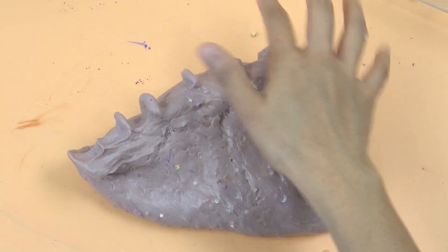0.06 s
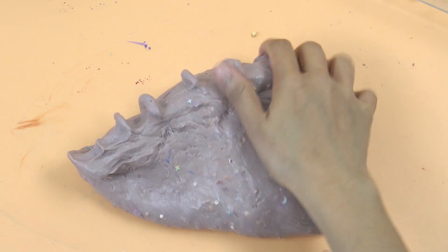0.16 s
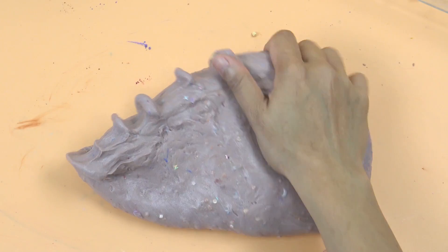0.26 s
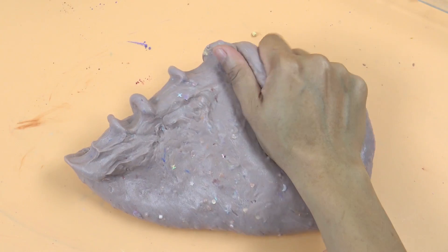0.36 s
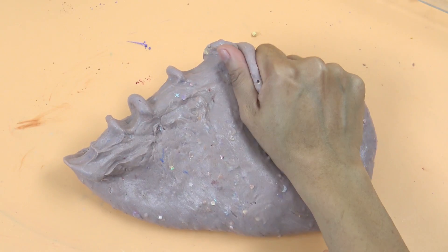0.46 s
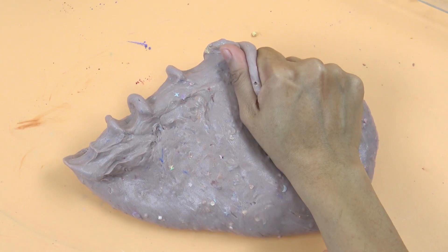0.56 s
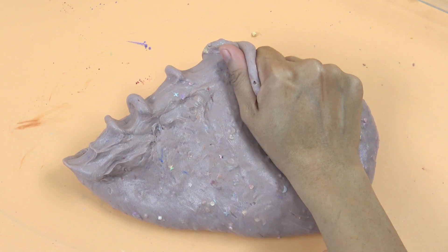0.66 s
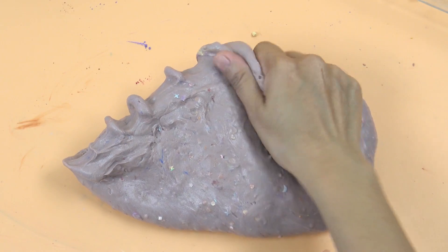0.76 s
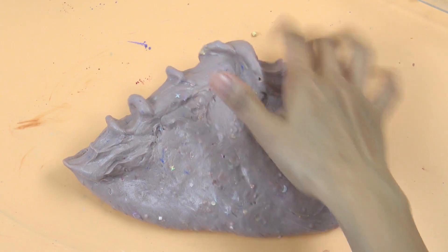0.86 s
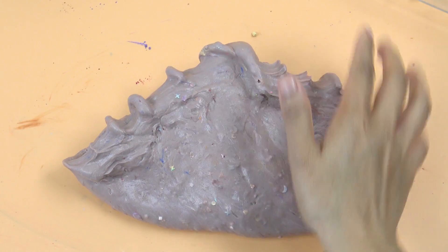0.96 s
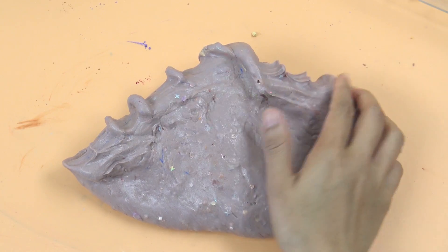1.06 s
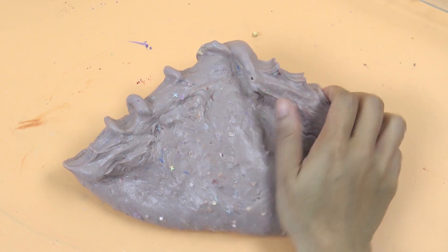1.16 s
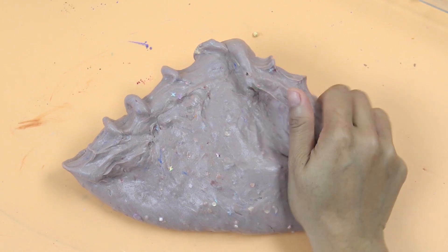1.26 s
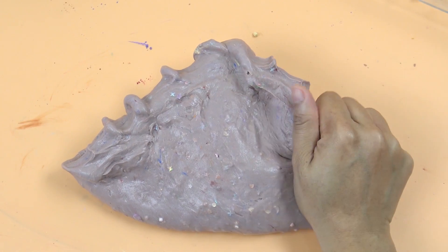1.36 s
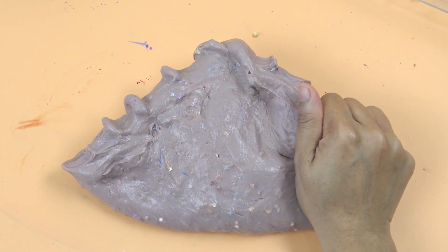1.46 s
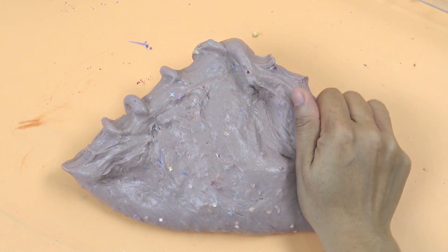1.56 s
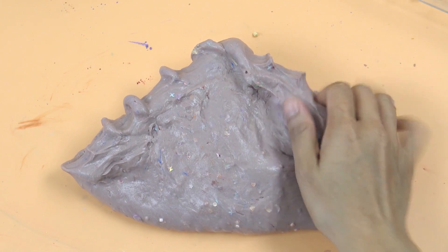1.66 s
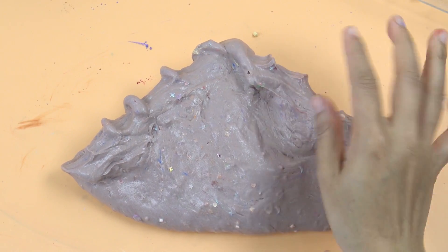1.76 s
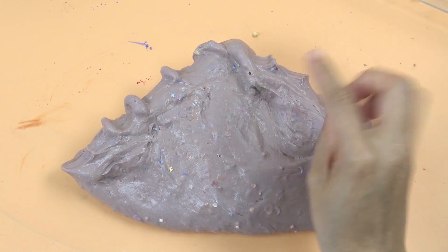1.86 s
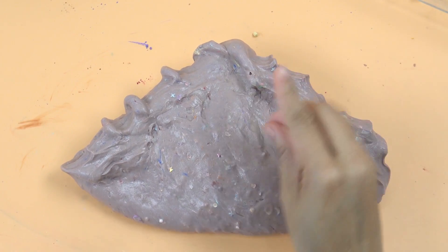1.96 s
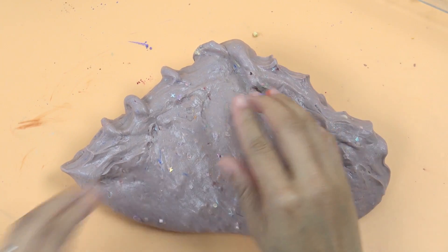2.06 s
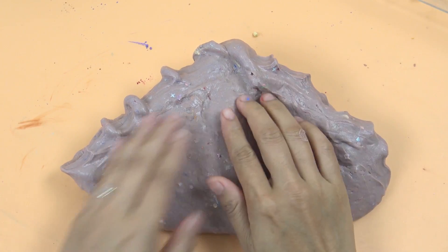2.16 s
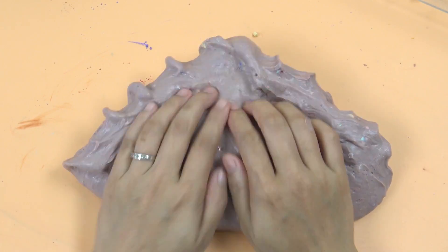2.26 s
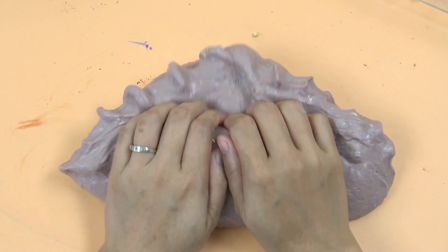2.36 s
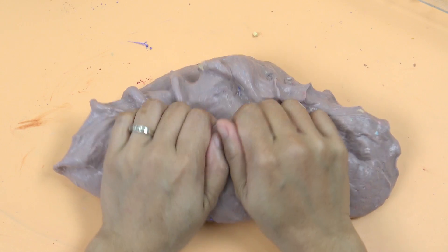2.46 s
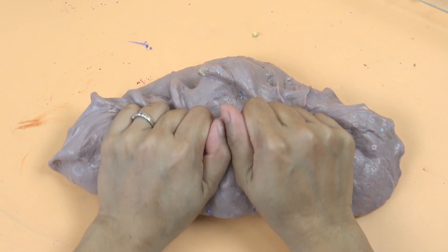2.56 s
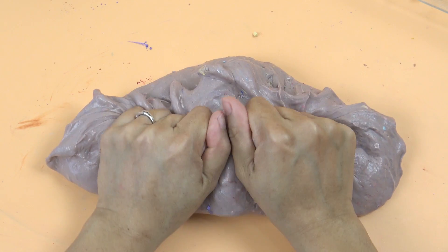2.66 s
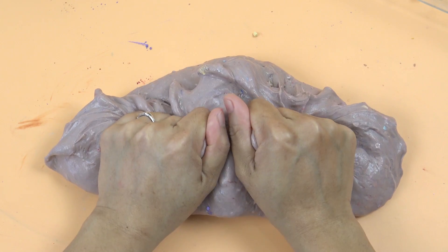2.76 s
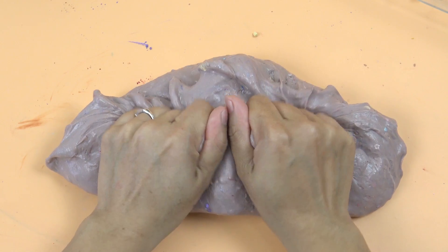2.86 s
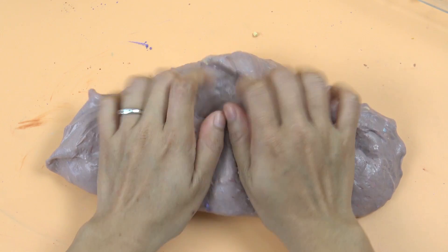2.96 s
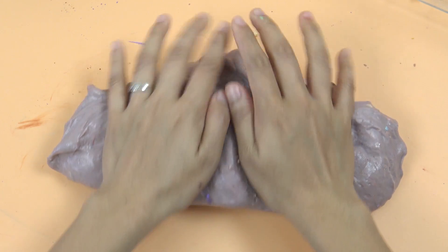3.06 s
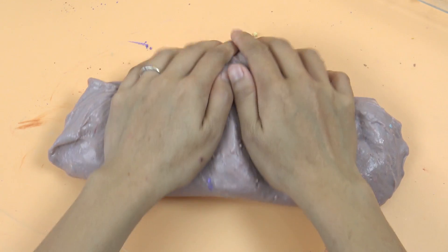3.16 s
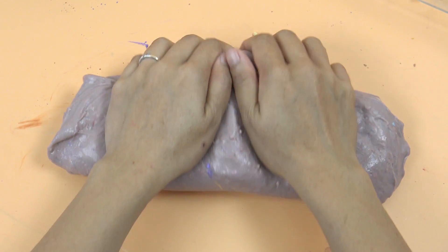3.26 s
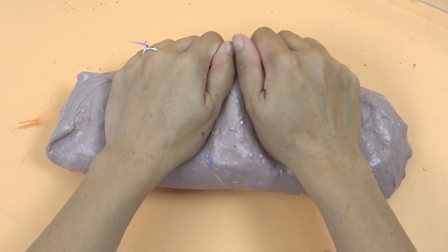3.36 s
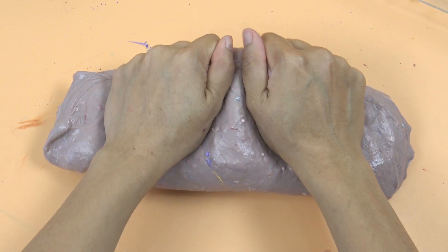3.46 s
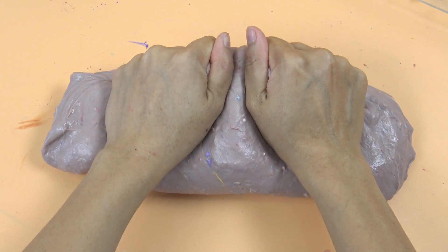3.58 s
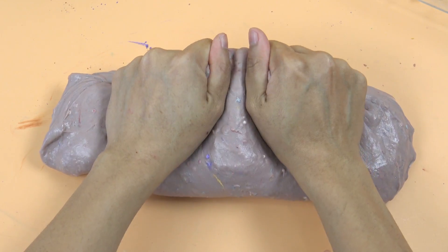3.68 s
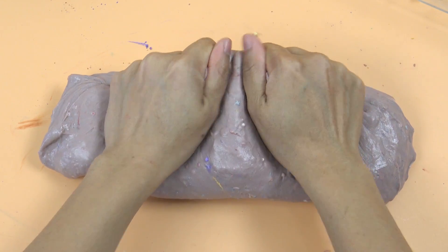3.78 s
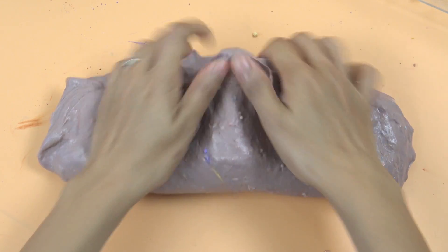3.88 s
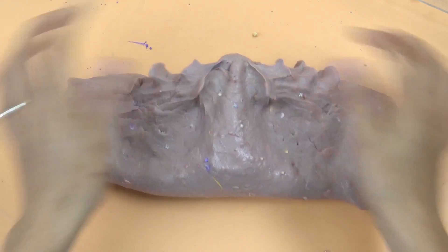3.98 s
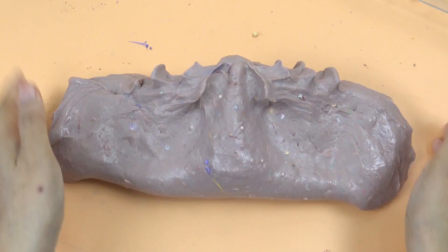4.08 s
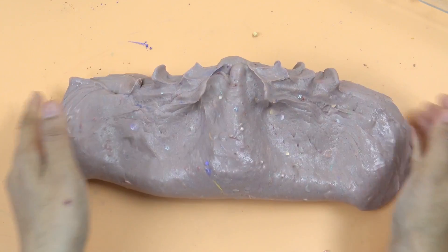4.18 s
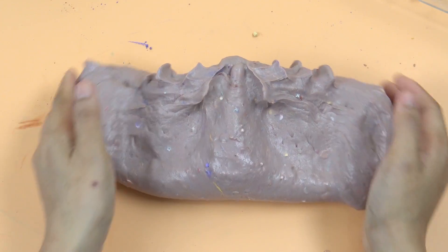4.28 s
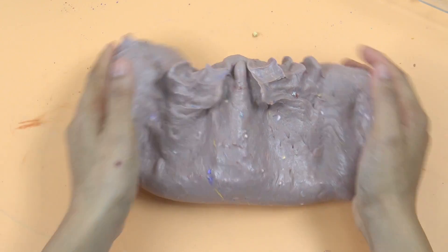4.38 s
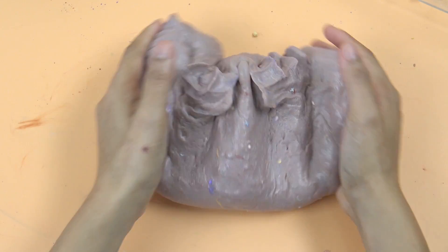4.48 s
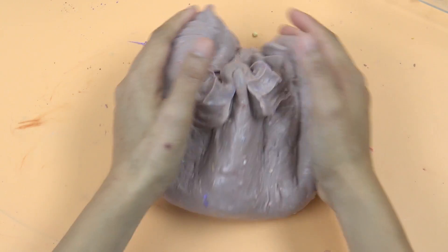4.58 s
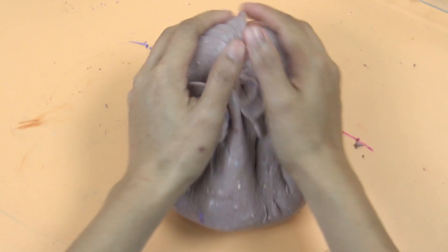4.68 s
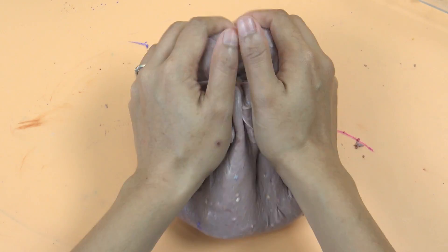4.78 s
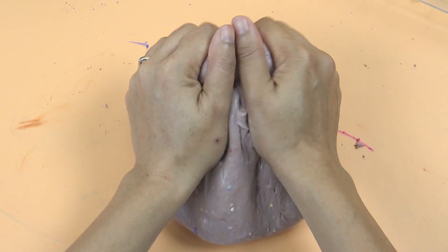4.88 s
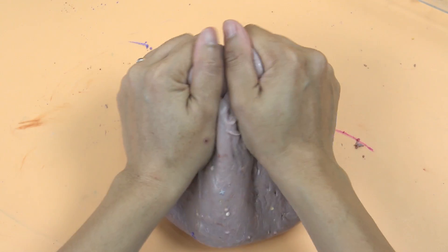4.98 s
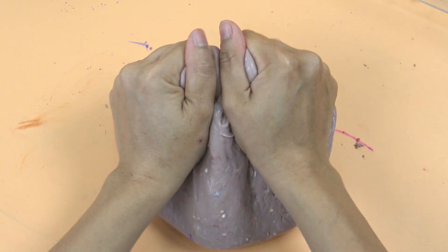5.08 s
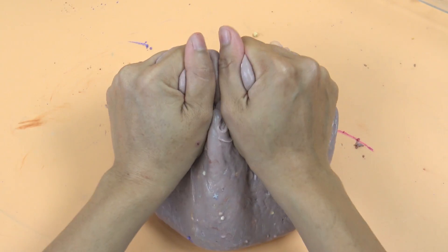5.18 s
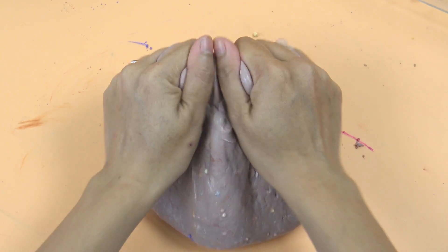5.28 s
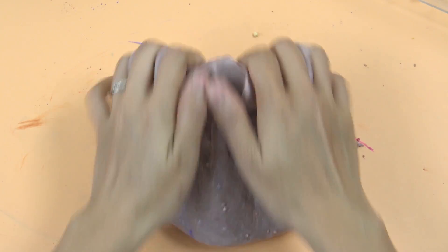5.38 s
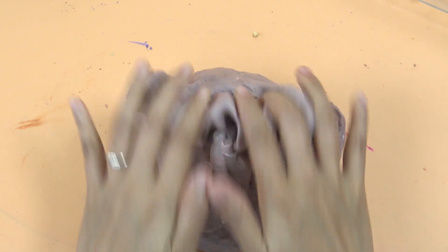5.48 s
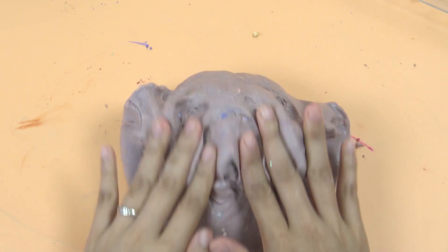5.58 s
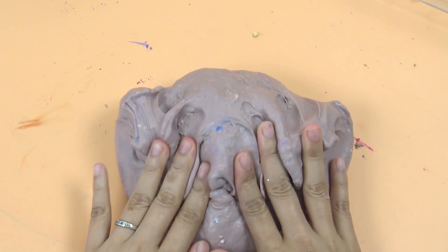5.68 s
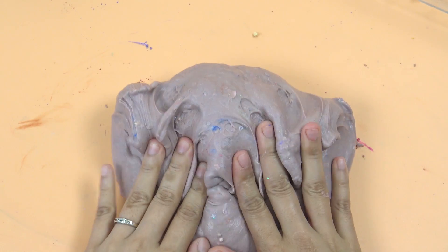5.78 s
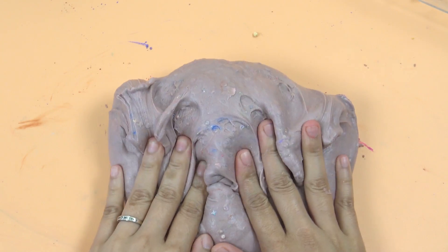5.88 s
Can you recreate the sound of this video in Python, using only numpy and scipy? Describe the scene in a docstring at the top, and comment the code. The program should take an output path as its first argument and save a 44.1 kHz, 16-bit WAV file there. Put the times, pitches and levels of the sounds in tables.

```python
"""Hands knead a lump of thick slime on a table: first light pats and squeezes, with one big bang near 0.5 s.
Hard, sticky peels (the loudest near 3 and 4 s) and more squeezes follow, up to a last gentle squeeze.
Each move is a level curve driving noise for the table thud and swarms of damped tones for the bubbles.
Single pops are short bursts ringing resonances; noise through resonances makes thumps, hisses and squeaks.
A small room echoes it all over faint air and a thin whine; peaks beyond full scale are clipped."""
import sys
import numpy as np
from scipy import signal
from scipy.fft import rfft, irfft, next_fast_len
from scipy.io import wavfile
from scipy.ndimage import uniform_filter1d, map_coordinates

SR = 44100
rng = np.random.default_rng(int(sys.argv[2]) if len(sys.argv) > 2 else 0)


def generate_wav(signal):
    """Clip the signal to [-1, 1] and save it as 16-bit WAV at the path in sys.argv[1]."""
    frames = np.transpose(np.atleast_2d(signal))
    scaled = np.clip(frames, -1, 1) * 32767
    pcm = np.round(scaled).astype(np.int16)
    wavfile.write(sys.argv[1], SR, pcm)


N = 261513  # length in samples
TOP_HZ = 16100  # upper limit of the bubbles' pitch and of the recorder
PEEL_RISE_S = .04

# A hand pulls ever harder at the sticky skin until it comes free; levels are before the trims in kneading():
# (time [s], hold [s], fade [s], air pockets [dB], crackle [dB], fizz [dB], crackle pitch [Hz])
PEELS = [(-.035, .015, .05, -56, -46, -50.5, 2490), (.822, .075, .012, -32, -26, -29.5, 2190),
         (1.692, .035, .018, -39, -26, -32, 2464), (2.961, .035, .065, -27, -21, -24, 1960),
         (3.888, .07, .04, -29, -23, -26, 2185), (5.35, .075, .05, -41, -35, -32.5, 2700)]


def amp(db):
    """Turn decibels into a gain."""
    return 10 ** (np.asarray(db) / 20)


def unit(x):
    """Scale to an average strength (rms) of 1."""
    return x / np.sqrt(np.mean(x ** 2) + 1e-20)


def along(points, hz):
    """Join (frequency, value) points with straight lines on a log frequency axis."""
    f, v = np.transpose(points)
    return np.interp(np.log(hz + 1), np.log(f + 1), v)


def wobble(rate):
    """A smooth random curve with rate random knots a second."""
    knots = rng.standard_normal(int(N * rate / SR) + 4)
    return map_coordinates(knots, [np.arange(N) * rate / SR])


def filtered(x, response):
    """Multiply the spectrum of x by a response of frequency."""
    m = next_fast_len(N + SR // 4)
    spectrum = rfft(x, m) * response(np.fft.rfftfreq(m, 1 / SR))
    return irfft(spectrum, m)[..., :N]


def coloured(x, points):
    """Give x a tone colour of (frequency [Hz], level [dB]) points."""
    return filtered(x, lambda hz: amp(along(points, hz)))


def steady(x, size):
    """Even out a stereo texture to about rms 1 over stretches of size samples."""
    power = np.mean(x ** 2, axis=0)
    power = uniform_filter1d(uniform_filter1d(power, size), size)
    return x / np.sqrt(np.abs(power) + 1e-12)


def stereo_noise(side_db, size):
    """White noise, partly shared by both channels; a higher side_db is wider."""
    mid, side = rng.standard_normal((2, size))
    return mid + amp(side_db) * np.array([side, -side])


def resonate(x, hz, q):
    """Pass x through one resonance; a higher q is narrower and rings longer."""
    return signal.lfilter(*signal.iirpeak(min(hz, .4 * SR), max(q, 1), SR), x)


def kneading():
    """The hands drive three sizes of bubbles, in clumps, and push the lump against the table."""
    # tone colour of each layer: (frequency [Hz], level [dB])
    thud_colour = [(15, -16), (40, -15), (70, -2.5), (110, 6), (170, -3.5), (250, 3.5), (400, -25),
                   (900, -71)]
    pocket_colour = [(60, -46), (180, -11.5), (280, -0.5), (500, -1.5), (900, 1.5), (1300, -3), (2500, -30),
                     (8000, -57)]
    crackle_colour = [(200, -34.5), (700, -2), (1100, 2), (2000, -1.5), (3500, -1), (5200, 1.5),
                      (7000, -11.5), (14000, -29)]
    fizz_colour = [(1000, -35.5), (4000, -6.5), (5600, -2), (7000, -0.5), (9000, 1.5), (11500, 2.5),
                   (12800, 0), (16000, -0.5)]
    thud_db, pocket_db, crackle_db, fizz_db, crackle_hz = strokes()
    clumps = jerks(per_second=140, relax_s=0.0078)
    rumble = coloured(stereo_noise(side_db=2.0, size=N), thud_colour)
    thud = amp(thud_db - 0.5) * steady(rumble, size=1500)
    pockets = swarm(pocket_db - 2.0, 700, 580, scatter=.45, cycles=1.1, spread_db=2.0,
                    width=0.29, colour=pocket_colour, size=600)
    crackle = swarm(crackle_db - 1.5, 3300, crackle_hz, scatter=.5, cycles=2.4, spread_db=0,
                    width=0.56, colour=crackle_colour, size=200)
    fizz = swarm(fizz_db - .4, 9000, 9000, scatter=0.25, cycles=4.5, spread_db=3.5,
                 width=0.72, colour=fizz_colour, size=56)
    # single snaps stop growing above a fizz of -32 dB, so loud tearing drowns them
    snaps = ticks(np.minimum(fizz_db, -32) + 9.5, per_second=61, spread_db=-1.0, pan_db=4.5)
    return thud + amp(2.5 * clumps) * (pockets + crackle) + amp(2.3 * clumps) * fizz + snaps


def strokes():
    """Pats, squeezes, peels and the big bang's fizz add up to four layer levels and the crackle's pitch."""
    # a hand lands on the lump: (time [s], level before the mix [dB])
    pats = [(.212, -48), (.25, -41), (1.103, -50), (4.167, -41.5), (4.237, -40), (4.262, -43)]
    # shares of a pat: table thud, air pockets, crackle, fizz [dB]
    pat_mix_db = [-2.5, -3, -3, -13]
    # squeezes, and the crackling fizz that follows the big bang; levels are before the trims in kneading():
    # (time [s], rise [s], hold [s], fade [s],
    # table thud [dB], air pockets [dB], crackle [dB], fizz [dB], crackle pitch [Hz])
    squeezes_and_fizz = [(0.269, .08, .02, .14, -58, -55, -45, -40, 3390),
                         (0.464, .03, .005, .12, -68, -39, -24.5, -35, 4400),
                         (1.235, .055, .1, .08, -61.5, -52, -45, -42, 3300),
                         (2.28, .13, .05, .06, -58, -48, -53, -62, 1300),
                         (2.422, .06, .07, .15, -68, -50, -40, -35.5, 3050),
                         (2.519, .04, .04, .13, -62, -39, -36, -39.5, 2945),
                         (2.661, .02, .01, .08, -78, -57, -41, -37, 3660),
                         (2.787, .018, .005, .08, -85, -60, -42.5, -37, 3100),
                         (3.05, .04, .19, .3, -61.5, -72, -51, -63, 1650),
                         (3.281, .13, .19, .06, -72, -45, -36, -33.5, 3030),
                         (3.609, .025, .025, .16, -60, -44, -33, -35.5, 3560),
                         (4.295, .055, .075, .06, -43.5, -31, -25.5, -27, 3140),
                         (4.42, .04, .1, .2, -78, -40, -31, -32, 2710),
                         (4.64, .03, .015, .025, -80, -47, -37, -39, 2550),
                         (4.72, .06, .14, .05, -81.5, -66, -57, -46, 3126),
                         (4.799, .05, .025, .07, -75, -43, -45, -52.5, 2550),
                         (4.936, .04, .04, .06, -64.5, -48, -33, -30, 4120),
                         (5.021, .03, .09, .12, -82, -50, -44, -38, 3400),
                         (5.46, .04, .095, .045, -51.5, -55, -43, -37, 2426)]
    sag_db_per_s = 25  # the level sinks during the hold
    peel_build_db_per_s = 20  # a peel grows while it is held
    peel_thud_db = -7  # relative to the air pockets
    # the freed skin sinks back: thud, pockets, crackle, fizz relative to the peel's crackle
    settle_mix_db, settle_fade_s = np.array([-19.5, -28.5, -23, -32]), .085
    rest_db = -88  # the lump left alone

    moves = []
    for s, db in pats:
        pat = grip(s, rise_s=.009, hold_s=0.013, fade_s=0.046, drift_db_per_s=0)
        moves.append((pat, db + np.array(pat_mix_db), 2090))  # last: crackle pitch in Hz
    for s, rise_s, hold_s, fade_s, *layers_db, hz in squeezes_and_fizz:
        moves.append((grip(s, rise_s, hold_s, fade_s, -sag_db_per_s), layers_db, hz))
    for s, hold_s, fade_s, pocket_db, crackle_db, fizz_db, hz in PEELS:
        pull = grip(s, PEEL_RISE_S, hold_s, fade_s, peel_build_db_per_s)
        moves.append((pull, [pocket_db + peel_thud_db, pocket_db, crackle_db, fizz_db], hz))
        settle = grip(s + hold_s, PEEL_RISE_S, 0, settle_fade_s, 0)
        moves.append((settle, crackle_db + settle_mix_db, hz))

    effort, mix_db, pitch_hz = map(np.array, zip(*moves))
    power, weight = effort ** 2, amp(mix_db.T) ** 2
    levels_db = 10 * np.log10(weight @ power + amp(rest_db) ** 2)
    # the move that crackles loudest counts most for the pitch
    crackle_hz = (weight[2] * pitch_hz) @ power / (weight[2] @ power)
    ms = np.arange(N) * 1000 / SR  # the curves have one point per millisecond
    return [np.interp(ms, np.arange(len(c)), c) for c in (*levels_db, crackle_hz)]


def grip(s, rise_s, hold_s, fade_s, drift_db_per_s):
    """Gain of one move: climbs 20 dB from time s, drifts while held, then drops 20 dB every fade_s."""
    t = np.arange(0, N / SR, 1 / 1000) - s - rise_s  # zero when fully risen
    climb = (np.minimum(t, 0) / max(rise_s, .002)) ** 2
    drop = np.maximum(t - hold_s, 0) / max(fade_s, .002)
    level_db = -20 * (climb + drop) + drift_db_per_s * np.clip(t, 0, hold_s)
    return amp(np.maximum(level_db, -150))


def jerks(per_second, relax_s):
    """The sticky skin lets go in sudden random jerks that each die away; rms 1 around zero."""
    kicks = (rng.random(N) < per_second / SR) * rng.uniform(.3, 1, N)
    x = signal.lfilter([1], [1, -np.exp(-1 / (relax_s * SR))], kicks)
    return unit(x - x.mean())


def swarm(level_db, per_second, pitch_hz, scatter, cycles, spread_db, width, colour, size):
    """Bursting bubbles along a level curve: each a damped tone with its own pitch, length and place."""
    count = int(per_second * N / SR)  # per_second is the average over the whole scene
    chance = rng.random((count, 2))
    pitch, life, pan, skew = rng.standard_normal((count, 4)).T[:, :, None]
    # louder moments get more of the bubbles
    burst_so_far = np.cumsum(amp(.27 * level_db))
    start = np.searchsorted(burst_so_far, chance[:, :1] * burst_so_far[-1])
    # neighbouring bubbles are alike in size, so the swarm's pitch wanders
    centre_hz = pitch_hz * np.exp(.13 * wobble(35))
    hz = np.minimum(centre_hz[start] * np.exp(scatter * pitch), TOP_HZ)
    turns = hz * np.arange(size) / SR
    # where spread_db is above zero, a few bubbles are much stronger than the rest
    strength = amp(spread_db * np.minimum(-np.log(1 - chance[:, 1:]), 5))
    decay = np.exp(-turns / (cycles * np.exp(life)))
    fade = strength * np.sqrt(hz) * decay * (1 - np.exp(-6 * turns))
    where = (start + np.arange(size)).ravel()

    def heard(side):
        """Each bubble reaches left (1) and right (-1) with its own balance and phase."""
        tone = np.sin(2 * np.pi * turns + side * width * skew)
        return fade * np.exp(side * width * pan / 2) * tone

    pair = np.array([np.bincount(where, heard(side).ravel(), N + size)[:N] for side in (1, -1)])
    return amp(level_db) * steady(coloured(pair, colour), size=700)


def ticks(level_db, per_second, spread_db, pan_db):
    """Thin films snap one by one: random clicks of varied strength and place ring three resonances."""
    snaps = (rng.random(N) < per_second / SR) * rng.choice([-1, 1], N)
    size_db = spread_db * np.minimum(rng.exponential(size=N), 3.5)
    place_db = pan_db * rng.standard_normal(N) / 2
    clicks = snaps * amp(level_db + size_db + np.array([place_db, -place_db]))
    high = resonate(clicks, 9700, q=1.3)
    middle = amp(-3.5) * resonate(clicks, 2600, q=2.2)
    low = amp(-4.5) * resonate(clicks, 900, q=2.2)
    return high + middle + low


def pops(size=1024):
    """A bubble's film tears with a snap; the released air rings its opening and its cavity."""
    # single bubbles; brightness raises the snap and lowers the cavity:
    # (time [s], level of the opening [dB], cavity [Hz], opening [Hz], brightness [dB])
    bubbles = [(0.2145, -29, 1190, 3230, 7.5), (0.3446, -27, 1420, 3070, 2), (.4406, -32.5, 1030, 3960, -3),
               (0.52, -26.5, 940, 3820, 8.5), (0.5669, -19, 1140, 3750, -1.5),
               (0.6385, -29.5, 710, 4160, 6), (.794, -45, 1060, 3260, -1), (.8652, -19.5, 1110, 3500, -1),
               (.9019, -19.5, 1040, 1980, -9.5), (0.9328, -16, 930, 1730, -5), (1.226, -41, 1260, 2620, -5),
               (1.4146, -32, 1000, 4130, 2), (1.7515, -16, 1240, 3570, -2), (1.7621, -15, 1300, 1960, 0),
               (2.3816, -40, 620, 1860, -10), (2.5434, -16.5, 700, 2600, 5),
               (2.5964, -12.5, 434, 3010, 2.5), (2.629, -17.5, 636, 2720, 0),
               (2.6849, -21.5, 1120, 2950, 8.5), (2.7117, -33, 1400, 2800, -3.5),
               (2.737, -43, 900, 2000, -6), (2.7638, -26.5, 1356, 2710, 5), (2.795, -12, 1270, 2090, 7),
               (2.9933, -12.5, 940, 3020, 3.5), (3.012, -7, 1460, 1770, -4), (3.0296, -14, 1290, 1610, 7.5),
               (3.1808, -44, 1200, 4000, -2), (3.4248, -23, 706, 2970, 4.5),
               (3.4538, -24.5, 1436, 3080, 17.5), (3.512, -20.5, 740, 3600, -3.5),
               (3.5547, -14.5, 930, 2330, -2), (3.6138, -6.5, 974, 2500, 7.5), (3.6366, -7.5, 697, 4250, 1),
               (3.715, -8.5, 940, 4260, -1), (3.9205, -11.5, 730, 4150, 1.5), (3.9258, -9.5, 910, 2680, -3),
               (3.9328, -9, 920, 2210, -5), (3.9483, -9.5, 1210, 4250, -1), (3.966, -15, 1170, 1990, -6.5),
               (4.165, -38.5, 318, 2530, -5.5), (4.1789, -35.5, 341, 2960, -10.5),
               (4.345, -26, 520, 2500, -5), (4.4154, -13.5, 587, 2770, 3), (4.5327, -23, 1040, 2320, 7),
               (4.6475, -34.5, 600, 3060, 2), (4.8249, -30, 740, 3480, 5.5), (4.856, -22, 486, 3130, -3),
               (4.8904, -38.5, 885, 1400, -19.5), (4.9779, -10, 1440, 5800, 7),
               (5.0109, -12.5, 431, 2500, 7.5), (5.071, -32, 450, 2580, 19.5), (5.151, -15, 800, 2300, 5.5),
               (5.5888, -33, 795, 1714, 7), (5.8556, -62.5, 450, 1766, -20)]
    # thin surface films that only click: (time [s], level of the opening [dB])
    films = [(0.3568, -45), (0.4076, -33), (0.4535, -37), (.659, -52.5), (1.3425, -40), (1.3649, -46),
             (1.3883, -56), (2.4925, -42), (2.5195, -36.5), (2.5478, -29), (2.5702, -44), (2.7549, -40),
             (2.7704, -51), (2.8031, -33), (2.866, -50), (3.5256, -50), (3.588, -38.5), (4.288, -46),
             (4.4291, -23.5), (4.723, -48), (4.761, -57), (4.8028, -49), (4.9653, -29), (5.003, -36),
             (5.0273, -31.5), (5.1096, -41), (5.189, -49), (5.212, -44.5), (5.2605, -43)]
    cavity_rel_db, snap_rel_db = -3.5, -3.5  # relative to the opening, at brightness 0
    tear_ms, tear_slope_db = 1.6, -0.64  # tearing time at brightness 0; its change per dB of brightness

    out = np.zeros((2, N + size))
    ms = np.arange(size) / SR * 1000
    # all films share one cavity pitch, opening pitch and high brightness
    clicks = [(s, db, 1050, 3400, 19.5) for s, db in films]
    for s, opening_db, cavity_hz, opening_hz, bright_db in bubbles + clicks:
        # a thin film tears fast and mostly snaps; a thick one tears slowly and mostly rings the cavity
        cavity_db = opening_db + cavity_rel_db - bright_db
        snap_db = opening_db + snap_rel_db + bright_db
        tearing = np.exp(-ms / (tear_ms * amp(tear_slope_db * max(bright_db, -4))))
        pan_db = rng.normal(-2, 4.7)  # left minus right, before scene() narrows the stereo
        snap_hz = 9070 * np.exp(0.023 * rng.standard_normal())
        release = 2.7 * (ms == 0)  # one sudden impulse
        cavity_drive = 1.2 * release + tearing * stereo_noise(side_db=-18.0, size=size)
        cavity = burst(cavity_drive, cavity_hz, q=1.7, skirt_q=0.99)
        opening_drive = release + tearing * stereo_noise(side_db=-16.5, size=size)
        opening = burst(opening_drive, opening_hz, q=2.5, skirt_q=1.1)
        snap_drive = release + tearing * stereo_noise(side_db=-2.5, size=size)
        snap = burst(snap_drive, snap_hz, q=1.6, skirt_q=1.05)
        # the collapsing wall gives one soft, low push
        push = amp(-28.5) * (1 - ms / 0.49) * np.exp(-ms / 0.76)
        # the first instant of the tear is a broad tick
        tick_db = np.logaddexp(opening_db, snap_db) - 15
        tick = amp(tick_db) * burst(np.array([release, release]), 4200, q=1.02, skirt_q=1.02)
        pop = amp(cavity_db) * (cavity + push) + amp(opening_db) * opening + amp(snap_db) * snap + tick
        out[:, round(s * SR):][:, :size] += pop * amp([[pan_db / 2], [-pan_db / 2]])
    return out[:, :N]


def burst(drive, hz, q, skirt_q):
    """A short drive rings a resonance, scaled to the energy of one millisecond at rms 1."""
    ring = resonate(resonate(drive, hz, q), hz, skirt_q)
    return ring / np.sqrt(np.mean(np.sum(ring ** 2, axis=1)) / (SR / 1000))


def big_pocket(s, blast_db, blast_s, spray_db, spray_s, thump_db, thump_hz):
    """A large pocket bursts with a bang and a low thump; a wet spray of small bursts outlasts them."""
    # tone colour of the bang and of the spray: (frequency [Hz], level [dB])
    blast_colour = [(30, -17), (80, -15.5), (230, -14), (400, -1), (720, 5), (1100, -13.5), (1900, 1),
                    (2800, -2), (4500, -4), (6200, -7), (7500, -8.5), (16000, -20.5)]
    spray_colour = [(150, -25), (300, -9), (450, 6.5), (750, -2), (1100, -8), (2000, 1), (3000, -3),
                    (5000, -1), (6200, 0.5), (7000, -13.5), (16000, -29.5)]
    t = np.maximum(np.arange(N) / SR - s, 0)
    blast_noise = unit(coloured(stereo_noise(side_db=-7, size=N), blast_colour))
    blast = amp(blast_db) * np.exp(-t / blast_s) * blast_noise
    spray_noise = unit(coloured(stereo_noise(side_db=-1.5, size=N), spray_colour))
    spray = amp(spray_db) * np.exp(-t / spray_s) * spray_noise
    spray = spray * amp(1.5 * jerks(per_second=200, relax_s=.0018))
    thump = amp(thump_db) * np.exp(-t / 0.0042) * np.cos(2 * np.pi * thump_hz * t)
    # the emptied hollow rings briefly
    tones = np.sin(2 * np.pi * 470 * t) + np.sin(2 * np.pi * 700 * t)
    hollow = amp(-9.0) * np.exp(-t / 0.003) * tones
    return (t > 0) * (blast + thump + hollow + spray)


def resonant_noises(size=16384):
    """Short resonant noises: noise through a resonance swells quickly, then fades."""
    # low thumps and gulps, mid squelches, lingering hisses, thin squeaks; the time is where the fade begins:
    # (time [s], pitch [Hz], level [dB], fade [s])
    noise_table = [(.01, 1538, -61, 0.055), (0.226, 139, -55, .036), (.26, 1920, -41.5, 0.011),
                   (0.311, 110, -52.5, 0.054), (.5, 2700, -37, 0.1), (.56, 5100, -42.5, .11),
                   (.58, 3700, -48, .09), (.63, 147, -54.5, 0.14), (1.115, 131.3, -47.5, 0.039),
                   (0.918, 3800, -24, .012), (1.191, 430, -52.5, 0.057), (1.199, 1390, -54, .08),
                   (1.3, 3340, -45.5, .02), (1.375, 4270, -40, 0.021), (1.8, 103.9, -45.5, 0.045),
                   (2.35, 547, -59.5, 0.054), (2.602, 2900, -33.5, 0.047), (2.6, 322, -43.5, .021),
                   (3.015, 1830, -11.5, 0.011), (3.1, 1690, -50.5, .12), (3.2, 1050, -50, 0.0081),
                   (3.25, 1950, -55, .08), (3.22, 99, -53, .037), (3.51, 328, -39.5, 0.021),
                   (3.64, 175, -40, 0.01), (3.68, 4900, -34, .045), (3.96, 263, -30.5, 0.016),
                   (4.264, 244, -35.5, 0.027), (4.345, 510, -29, 0.016), (4.41, 3540, -25, .013),
                   (4.675, 2900, -32.5, 0.0051), (5.016, 410, -36, 0.011), (5.37, 379, -52, 0.021),
                   (5.459, 1380, -34.5, 0.02), (5.55, 1560, -45, 0.046), (5.862, 461, -56, .03)]
    out = np.zeros((2, N + 2 * size))
    t = np.arange(size) / SR
    noises = [(*row, 3.8) for row in noise_table]  # last: resonance q
    # a thin ring near 4.5 kHz lingers as each peel ends, 23 dB below its crackle
    peel_rings = [(s + PEEL_RISE_S + hold_s, 4534, crackle_db - 23, 0.063, 7)
                  for s, hold_s, _, _, crackle_db, _, _ in PEELS]
    lead_s = .009  # the swell starts this long before the fade
    for s, hz, db, fade_s, q in noises + peel_rings:
        ring = resonate(resonate(stereo_noise(side_db=-6.5, size=size), hz, q), hz, q)
        fade = np.exp(-(np.maximum(t - lead_s, 0) / fade_s) ** 1.35)
        swell = np.minimum(t / 0.0044, 1) ** 2 * fade
        start = max(round((s - lead_s) * SR), 0)
        out[:, start:][:, :size] += amp(db) * swell * steady(ring, size=900)
    return out[:, :N]


def room(x, wet_db):
    """The small room answers: x convolved with noise whose frequencies each die at their own speed."""
    # time for the echo to fall by 60 dB: (frequency [Hz], time [s])
    decay_times = [(100, 0.53), (400, 0.14), (1500, 0.2362), (3000, 0.17), (4800, 0.26), (7000, 0.23),
                   (15000, 0.16)]
    # tone colour of the echo: (frequency [Hz], level [dB])
    echo_colour = [(100, 1), (500, -3), (1500, -6.5), (3000, -3), (5000, 3), (8000, -3.5), (15000, -3)]
    hz, t, z = signal.stft(stereo_noise(side_db=-2.5, size=SR // 2), SR, nperseg=256)
    shape = amp(along(echo_colour, hz)[:, None] - 60 * t / along(decay_times, hz)[:, None])
    tail = signal.istft(z * shape, SR, nperseg=256)[1]
    tail *= 1 - np.exp(-np.arange(tail.shape[1]) / SR / 0.0016)  # soft onset
    return amp(wet_db) * signal.fftconvolve(x, tail / np.linalg.norm(tail[0]), axes=1)[:, :N]


def background(air_db, whine_hz, whine_db):
    """Faint room air is coloured noise; a thin whine is a sine with a slightly unsteady phase."""
    # tone colour of the quiet room: (frequency [Hz], relative level [dB])
    air_colour = [(15, -61), (25, -30.5), (153, -14.5), (180, -6), (223, -10), (405, -10.5), (677, -20.5),
                  (734, -8.5), (796, -18), (936, -18), (6380, -26), (14800, -29.5), (16000, -30)]
    air = unit(coloured(stereo_noise(side_db=0.5, size=N), air_colour))
    whine = np.sin(2 * np.pi * whine_hz * np.arange(N) / SR + 0.67 * wobble(18))
    return amp(air_db) * air + amp(whine_db) * whine


def scene():
    """Slime close by, the room behind it."""
    # a tearing film's snap softens at the very top: (frequency [Hz], level [dB])
    snap_colour = [(100, -0.5), (6000, -2), (11800, 0), (13000, -6), (16000, -4)]
    bang = big_pocket(s=.4693, blast_db=2.0, blast_s=0.0018, spray_db=-12.5, spray_s=0.024,
                      thump_db=-28.5, thump_hz=71)
    slime = kneading() + resonant_noises() + coloured(pops(), snap_colour) + bang
    # narrow the stereo: the left-right difference is turned down, most around 1500 Hz
    side_colour = [(100, -2), (400, -0.5), (1500, -8.5), (4000, -4.5)]
    side = coloured((slime[0] - slime[1]) / 2, side_colour)
    slime = slime.mean(axis=0) + np.array([side, -side])
    return slime + room(slime, wet_db=-15.5) + background(air_db=-69.5, whine_hz=750, whine_db=-77.5)


def record(dry):
    """The recorder clips at full scale and keeps almost nothing above its band limit."""
    clipped = np.clip(dry, -1, 1)
    return filtered(clipped, lambda hz: 1 / np.sqrt(1 + (hz / TOP_HZ) ** 160))


dry = scene()
out = record(dry)
generate_wav(out)
```